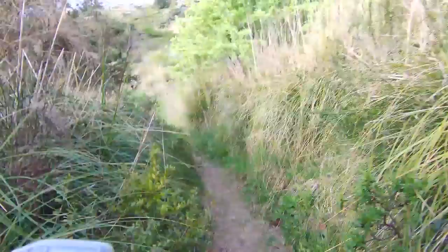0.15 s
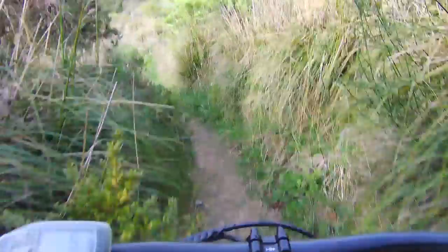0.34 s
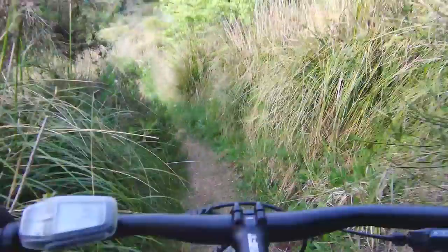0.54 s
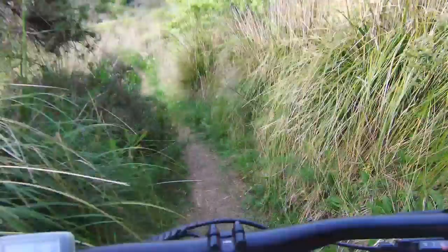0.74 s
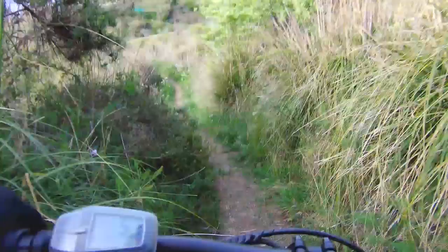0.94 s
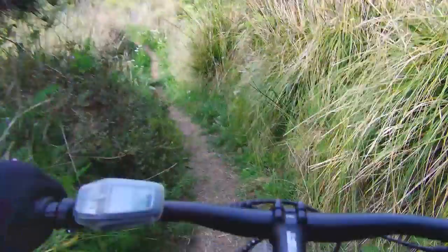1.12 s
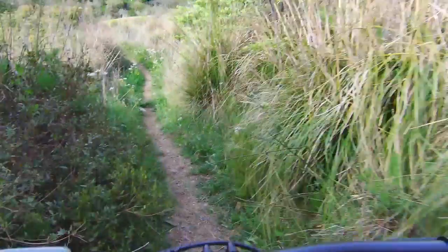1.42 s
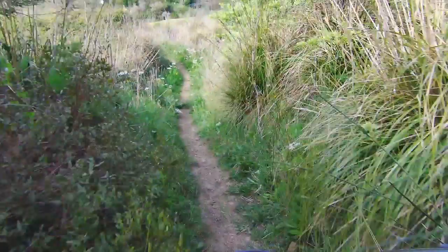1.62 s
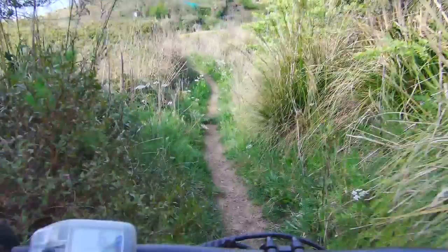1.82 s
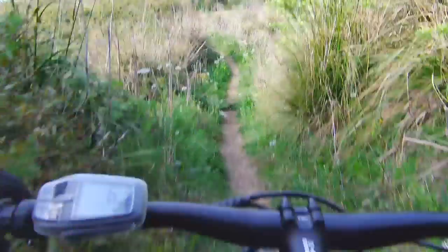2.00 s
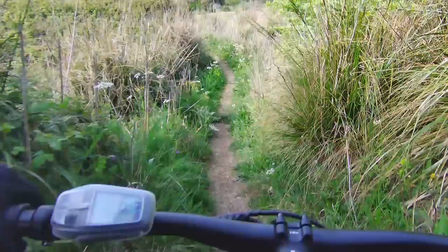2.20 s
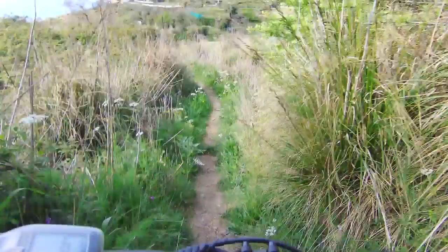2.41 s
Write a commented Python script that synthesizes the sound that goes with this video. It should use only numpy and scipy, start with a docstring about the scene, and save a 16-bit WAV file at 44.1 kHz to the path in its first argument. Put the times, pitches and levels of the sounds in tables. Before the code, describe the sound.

Muffled scuffing and knocking of a camera case on a bike ridden through tall grass

```python
"""A bike on a narrow dirt trail through tall grass, heard inside a closed case that is shaken and brushed.
Opens on light scuffing of filtered grains, over coloured-noise tyre rumble and faint hiss that run throughout.
From 0.2 s scuffs come thick, with trail bumps, stick-slip creaks and stem flicks (pings) and knocks (clicks).
Grass swishes (rough tones in airy noise) from 0.38 s to 2.03 s; dry stalks snap (noise bursts) from 0.91 s.
Rumble peaks near 1.28 s; the last knock falls at 1.98 s, the last creak at 2.31 s, a soft scuff at 2.42 s."""
import sys
import numpy as np
from scipy import signal
from scipy.fft import rfft, irfft
from scipy.io import wavfile
from scipy.ndimage import uniform_filter1d

SR = 44100
rng = np.random.default_rng(int(sys.argv[2]) if len(sys.argv) > 2 else 0)


def dump_mix(stems):
    """Bounce the given channels to the path in sys.argv[1] as a 16-bit WAV at rate SR."""
    frames = np.atleast_2d(stems).T  # one column per channel
    limited = np.clip(frames, -1, 1)  # hard clip at full scale
    pcm = np.round(limited * 32767).astype(np.int16)
    wavfile.write(sys.argv[1], SR, pcm)


N = 112454

# scuffs on the case: full_pressure_s, rise_s, hold_s, fall_t60_s, bass_db, low_modes_db, middle_modes_db, top_modes_db
SCUFF_STROKES = [ (0.010, 0.012, 0.022, 0.66, -68.5, -63.5, -64.5, -65.5),
                 (0.212, 0.013, 0.14, .20, -65, -54.5, -56.5, -65.5),
                 (0.307, 0.029, 0.0066, 0.22, -51, -41, -42, -45.5),
                 (0.342, 0.016, 0.013, 0.29, -49, -46, -48, -55.5),
                 (0.429, 0.048, 0.036, 0.76, -60, -53.5, -61, -63.5),
                 (0.505, 0.0035, 0.014, 0.18, -58.5, -54.5, -50, -56.5),
                 (0.646, 0.0054, 0.0063, 0.26, -55.5, -49.5, -56, -65.5),
                 (0.744, 0.02, 0.013, 0.072, -49.5, -44, -38.5, -42),
                 (0.773, 0.015, 0.02, 0.4, -50, -42.5, -44.5, -54),
                 (0.839, 0.012, 0.0044, 0.077, -60, -69, -66, -50.5),
                 (0.884, 0.033, 0.028, 0.16, -55.5, -51, -54.5, -67),
                 (1.033, 0.012, 0.006, 0.21, -53.5, -47.5, -42.5, -55),
                 (1.102, 0.059, 0.006, 0.35, -55, -44.5, -44.5, -52.5),
                 (1.191, 0.0023, 0.0064, 0.21, -47, -45, -46, -51.5),
                 (1.402, 0.0059, 0.0095, 0.24, -49.5, -40, -42, -45.5),
                 (1.454, 0.005, 0.016, 0.1, -55.5, -42.5, -48.5, -50),
                 (1.497, 0.015, 0.0088, 0.32, -66, -46, -50.5, -55.5),
                 (1.602, 0.0048, 0.02, 0.16, -57.5, -52.5, -56, -69),
                 (1.643, 0.024, 0.021, 0.29, -64.5, -52, -41.5, -48),
                 (1.682, 0.0049, 0.004, 0.2, -50, -46.5, -72, -50),
                 (1.744, 0.04, 0.019, 0.2, -53, -49, -49.5, -52.5),
                 (1.82, 0.028, 0.023, 0.24, -90, -57, -60.5, -57.5),
                 (1.935, 0.036, 0.0072, 0.17, -57, -49, -39, -44.5),
                 (1.962, 0.018, 0.015, 0.24, -51, -42, -44, -48.5),
                 (2.041, 0.021, 0.0063, 0.25, -54.5, -49.5, -51.5, -60.5),
                 (2.113, 0.092, 0.015, 0.34, -56, -60.5, -64, -62.5),
                 (2.261, 0.021, 0.0035, 0.17, -62.5, -56.5, -51.5, -59),
                 (2.276, 0.014, 0.0049, 0.37, -58.5, -51.5, -49.5, -62.5),
                 (2.416, 0.044, 0.05, 0.45, -75, -64, -68.5, -61.5)]
# modes of the case and its mount, three groups: mode_hz, width_hz, relative_level_db
CASE_LOW_MODES = [(287.4, 27.6, 6), (355, 21, -1.5), (398, 45, -1.5), (478.4, 39, 5.5)]
CASE_MIDDLE_MODES = [(605, 8.5, -1), (647, 33, 2.5), (690, 78, 2.5), (789, 17.6, -1.5), (890, 150, -3),
                     (940, 150, -5.5)]
CASE_TOP_MODES = [(1040, 170, 2.5), (1254, 49, -1.5), (1374, 73, -2.5), (1508, 64, -5), (1770, 660, -8),
                  (2110, 290, -8.5)]
# hard knocks on the case: start_s, peak_db, top_cutoff_hz
CASE_KNOCKS = [(0.3105, -30, 1410), (0.756, -21.5, 1320), (1.0372, -43, 1180), (1.1867, -21, 900),
               (1.6497, -31.5, 1230), (1.656, -39, 1100), (1.669, -38, 1460), (1.9340, -28, 1430),
               (1.9812, -25, 1150)]
# stick-slip creaks: start_s, peak_db, pitch_hz, swell_s
STICK_SLIP_CREAKS = [(0.041, -57.5, 1045, 0.0061), (0.283, -33, 825, 0.0048), (0.3128, -30, 680, 0.0037),
                     (0.3450, -33.5, 775, 0.0051), (0.7150, -33, 856, 0.0027), (0.7370, -32, 770, 0.0027),
                     (0.7875, -34.5, 702, 0.0043), (1.034, -32.5, 830, 0.0023), (1.0895, -28, 840, 0.0011),
                     (1.0978, -33.5, 767, 0.0022), (1.1042, -29.5, 780, 0.0025), (1.4035, -36, 750, 0.006),
                     (1.425, -34.5, 631, 0.008), (1.4535, -39.5, 772, 0.0069), (1.4675, -36.5, 760, 0.0046),
                     (1.6245, -32.5, 790, 0.014), (1.686, -37, 788, 0.0047), (1.9315, -28.5, 860, 0.0014),
                     (1.9790, -30, 676, 0.0034), (2.261, -39.5, 652.5, 0.0049),
                     (2.2750, -41.5, 788, 0.0064), (2.3105, -40, 643, 0.0029)]
# trail bumps that ring the mount: start_s, peak_db, pitch_hz, swell_s
TRAIL_BUMPS = [(0.095, -56, 287, 0.013), (0.2131, -36, 282, 0.009), (0.27, -37.5, 279, 0.014),
               (0.3067, -28.5, 326, 0.0019), (0.364, -35, 270, 0.0092), (1.214, -50.5, 68, 0.015),
               (2.066, -45, 95, 0.0047), (2.0921, -37, 80.5, 0.0056), (2.11, -46.5, 105, 0.0047)]
# stems flick the bars: start_s, peak_db, pitch_hz
STEM_FLICKS = [(0.2855, -49, 1560), (0.347, -45.5, 1960), (0.7385, -45.5, 2110), (0.76, -44, 1400),
               (0.8373, -44.5, 1890), (1.406, -42, 1560), (1.431, -41, 1410), (1.4665, -48, 2020),
               (1.962, -44, 2050), (2.1705, -44.5, 1110)]
# dry stalks snap: full_level_s, level_before_trim_db
STALK_CRACKS = [(0.9068, -48.5), (1.187, -48), (1.209, -65), (1.728, -61), (2.1712, -81)]
# grass along the bars: full_pressure_s, rise_s, hold_s, fall_t60_s, tone_db, pitch_hz, width_hz, air_re_tone_db
GRASS_SWISHES = [ (0.38, 0.015, 0.008, 0.14, -61.5, 2935, 226, -9),
                 (0.428, .05, .046, .24, -61, 3150, 490, -15), (0.43, .035, .078, .09, -72, 4760, 260, -20),
                 (0.756, 0.11, 0.15, 0.37, -78.5, 2930, 520, 6.5),
                 (1.179, 0.1, 0.028, 0.34, -71, 3160, 674, -0.5),
                 (1.818, 0.17, 0.27, 1, -77, 2970, 450, -21),
                 (2.034, 0.084, 0.012, 0.38, -67.5, 3300, 770, -1.5)]
# airy rustle spectrum: frequency_hz, relative_density_db
RUSTLE_SPECTRUM = [(800, 14), (1400, 2), (2200, 32), (2700, 15), (4000, -13), (4800, 12), (8000, -30),
                   (16000, -64)]
# tyres on dirt, spectrum: frequency_hz, relative_density_db
TYRE_SPECTRUM = [(25, 5.5), (70, -4), (130, 3.5), (200, -4), (290, 0.5), (420, 3), (650, -1.5),
                 (1300, -10.5), (2000, -23.5), (3000, -46), (5000, -60)]
# tyre rumble follows the roughness of the trail: time_s, level_db
TYRE_LEVEL = [(0, -62.5), (.19, -70), (.45, -74), (.7, -62.5), (1.0, -61), (1.28, -55), (1.355, -68.5),
              (1.5, -57), (1.9, -66.5), (2.22, -64.5), (2.36, -61), (2.55, -64)]
# treble hiss, spectrum: frequency_hz, relative_density_db
HISS_SPECTRUM = [(1500, 4.5), (2500, 6), (3800, -0.5), (4800, 0.5), (7000, -1.5), (16000, -1.5)]
# treble hiss: time_s, level_db
HISS_LEVEL_CURVE = [(0, -72.5), (.22, -75.5), (.32, -71.5), (.6, -72.5), (.88, -68), (1.0, -74), (1.2, -67),
                    (1.35, -76.5), (1.46, -70), (1.58, -70.5), (1.75, -69), (1.9, -71.5), (2.03, -67),
                    (2.22, -73.5), (2.323, -71.5), (2.55, -73.5)]

# *_RMS_DB and *_RMS_RAD: spread of a random wander; *_RATE_HZ: its low-pass corner
FULL_PRESSURE_GRAINS_PER_S, GRAIN_SPREAD_DB = 970, 3.5
GRAIN_RATE_POWER = 0.8  # grain rate ~ pressure ** power
MODE_SWAY_RMS_DB, MODE_SWAY_RATE_HZ = 2, 8.5
JUDDER_RMS_DB, JUDDER_RATE_HZ = 0.5, 33
BASS_HZ, BASS_WIDTH_HZ = 120.3, 78
CASE_LOW_HZ, CASE_TOP_HZ = 169, 1800
MIDDLE_LOW_HZ, MIDDLE_TOP_HZ, TOP_LOW_HZ = 404, 1196, 900
KNOCK_LOW_HZ = 312
CREAK_SLIP_RMS_RAD, CREAK_SLIP_RATE_HZ = 0.28, 174
FLICK_SWELL_S = 0.00073
CRACK_RISE_S, CRACK_T60_S, CRACK_TRIM_DB = 0.00026, 0.0056, -6
CRACK_LOW_HZ, CRACK_TOP_HZ = 1515, 6800
ZIP_ARCH_FRACTION, ZIP_ARCH_S = 0.07, 0.06
FLUTTER_RMS_DB, FLUTTER_RATE_HZ = 1, 90
TYRE_SWAY_RMS_DB, TYRE_SWAY_RATE_HZ = 0.5, 27
HISS_FLICKER_RMS_DB, HISS_FLICKER_RATE_HZ = 1.5, 20.4
CUTOFF_HZ = 15750


def scuffs():
    """Contact pressure drives mount bass and three groups of case modes, with judder."""
    band_powers = sum((from_db(row[4:])[:, None] * stroke(*row[:4])) ** 2 for row in SCUFF_STROKES)
    pressure = np.sqrt(band_powers)

    bass = rubbed([(BASS_HZ, BASS_WIDTH_HZ, 0)], pressure[0])
    bass = evened(cut(bass, 260, "low"), size=1800)

    low = cut(rubbed(CASE_LOW_MODES, pressure[1]), CASE_LOW_HZ, "high")
    low = evened(cut(low, 464, "low"))

    middle = cut(rubbed(CASE_MIDDLE_MODES, pressure[2]), MIDDLE_TOP_HZ, "low", order=4)
    middle = evened(cut(middle, MIDDLE_LOW_HZ, "high"), size=700)

    top = cut(rubbed(CASE_TOP_MODES, pressure[3]), CASE_TOP_HZ, "low", order=6)
    top = evened(cut(top, TOP_LOW_HZ, "high"))

    judder = from_db(JUDDER_RMS_DB * drift(JUDDER_RATE_HZ))
    return (pressure * [bass, low, middle, top]).sum(axis=0) * judder


def rubbed(modes, pressure):
    """Grains ring resonances; light contact thins them to ticks, a moving contact favours other modes."""
    grains_per_s = FULL_PRESSURE_GRAINS_PER_S * (pressure / pressure.max()) ** GRAIN_RATE_POWER
    out = 0
    for hz, width_hz, db in modes:
        radius = np.exp(-np.pi * width_hz / SR)
        poles = [1, -2 * radius * np.cos(2 * np.pi * hz / SR), radius * radius]
        ringing = signal.lfilter([1, 0, -1], poles, grains(grains_per_s) + 1e-18)
        sway_db = MODE_SWAY_RMS_DB * drift(MODE_SWAY_RATE_HZ)
        out = out + from_db(db + sway_db) * rms_one(ringing)
    return out


def grains(per_s):
    """Tiny catches of uneven size and random sign, at random times."""
    sizes = from_db(GRAIN_SPREAD_DB * np.minimum(rng.exponential(1, N), 4))
    signs = rng.choice([-1, 1], N)
    return sizes * signs * (rng.random(N) < per_s / SR)


def knocks():
    """Single hard contacts: band-limited impulses, dulled by the case."""
    out = np.zeros(N)
    for start_s, peak_db, top_hz in CASE_KNOCKS:
        impulse = signal.unit_impulse(N, int(start_s * SR))
        click = cut(cut(impulse, top_hz, "low", order=5), KNOCK_LOW_HZ, "high")
        out += from_db(peak_db) * click / np.abs(click).max()
    return out


def creaks():
    """Stick-slip pings; each catch lets go a little early or late, so the phase wanders."""
    slip_rad = CREAK_SLIP_RMS_RAD * drift(CREAK_SLIP_RATE_HZ)
    return sum(ping(*row, slip_rad) for row in STICK_SLIP_CREAKS)


def bumps():
    """Trail bumps ring the mount as short low pings."""
    return sum(ping(*row) for row in TRAIL_BUMPS)


def flicks():
    """Single stems strike the bars as very short pings."""
    return sum(ping(*row, FLICK_SWELL_S) for row in STEM_FLICKS)


def cracks():
    """Dry stalks snap: tiny bright bursts of band-passed noise."""
    noise = cut(rng.standard_normal(N), CRACK_LOW_HZ, "high")
    snap = rms_one(cut(noise, CRACK_TOP_HZ, "low"))
    level = sum(from_db(db + CRACK_TRIM_DB) * stroke(s, CRACK_RISE_S, 0, CRACK_T60_S)
                for s, db in STALK_CRACKS)
    return snap * level


def grass():
    """Blades slide over the bars: a thin fluttering zip that rises and falls, in airy rustle."""
    out, air = 0, coloured(RUSTLE_SPECTRUM)
    for full_s, rise_s, hold_s, t60_s, tone_db, hz, width_hz, air_db in GRASS_SWISHES:
        # pitch peaks as the blade bears fully on the bar, sags either side
        away = (np.arange(N) / SR - full_s) / ZIP_ARCH_S
        pitch_hz = hz * (1 - ZIP_ARCH_FRACTION * away ** 2 / (1 + away ** 2))
        swish = rough_tone(pitch_hz, width_hz) + from_db(air_db) * air
        out = out + from_db(tone_db) * stroke(full_s, rise_s, hold_s, t60_s) * swish
    return out * from_db(FLUTTER_RMS_DB * drift(FLUTTER_RATE_HZ))


def rough_tone(hz, width_hz):
    """A friction tone whose strength and phase keep slipping: narrow noise on a moving carrier."""
    phase = 2 * np.pi * np.cumsum(hz) / SR
    a, b = cut(rng.standard_normal((2, N)), width_hz / 2, "low", order=3)
    return evened(a * np.cos(phase) + b * np.sin(phase), size=500)


def tyres():
    """Rumble of tyres on dirt: coloured noise that follows the trail roughness."""
    level_db = np.interp(np.arange(N) / SR, *np.transpose(TYRE_LEVEL))
    sway_db = TYRE_SWAY_RMS_DB * drift(TYRE_SWAY_RATE_HZ)
    return coloured(TYRE_SPECTRUM) * from_db(level_db + sway_db)


def hiss():
    """Faint treble noise with a flickering level."""
    level_db = np.interp(np.arange(N) / SR, *np.transpose(HISS_LEVEL_CURVE))
    flicker_db = HISS_FLICKER_RMS_DB * drift(HISS_FLICKER_RATE_HZ)
    return coloured(HISS_SPECTRUM) * from_db(level_db + flicker_db)


def stroke(full_s, rise_s, hold_s, t60_s):
    """Pressure of one contact: exponential swell up to full_s, hold, exponential fall."""
    t = np.arange(N) / SR - full_s
    swell = np.exp(2 * np.minimum(t, 0) / rise_s)
    fall = from_db(-60 * np.maximum(t - hold_s, 0) / t60_s)
    return swell * fall


def ping(start_s, peak_db, hz, swell_s, slip_rad=0):
    """A sine that swells to its peak in swell_s and dies; slip_rad shifts its phase."""
    t = np.maximum(np.arange(N) / SR - start_s, 0)
    u = np.minimum(t / swell_s, 20)
    envelope = u ** 2 * np.exp(2 - 2 * u)
    return from_db(peak_db) * envelope * np.sin(2 * np.pi * hz * t + slip_rad)


def evened(x, size=1100):
    """Hold power near 1 over size samples, so that the contact pressure sets the level."""
    power = np.abs(uniform_filter1d(x ** 2, size))
    return x / np.sqrt(power + 1e-3 * np.mean(x ** 2))


def coloured(points):
    """Steady noise of unit power, spectrum interpolated in dB over log frequency."""
    hz, db = np.transpose(points)
    f = np.maximum(np.fft.rfftfreq(N, 1 / SR), 1)
    gain = from_db(np.interp(np.log(f), np.log(hz), db))
    return rms_one(irfft(rfft(rng.standard_normal(N)) * gain, N))


def drift(rate_hz):
    """Random wander of spread 1: low-passed noise, its first second dropped to settle the filter."""
    return rms_one(cut(rng.standard_normal(N + SR), rate_hz, "low")[SR:])


def cut(x, hz, kind, order=2):
    """Butterworth filter."""
    return signal.sosfilt(signal.butter(order, hz, kind, fs=SR, output="sos"), x + 1e-18)


def rms_one(x):
    """Scale to unit power."""
    return x / np.sqrt(np.mean(x ** 2) + 1e-20)


def from_db(db):
    """Decibels to amplitude gain."""
    return 10 ** (np.asarray(db) / 20)


def scene():
    """Sum of all sources at one microphone."""
    contacts = scuffs() + knocks() + creaks() + bumps() + flicks()
    plants = cracks() + grass()
    return (contacts + plants + tyres() + hiss())[None]


def record(dry):
    """Steep elliptic low-pass: 0.1 dB ripple, 70 dB stop band."""
    return signal.sosfilt(signal.ellip(12, 0.1, 70, CUTOFF_HZ, fs=SR, output="sos"), dry)


dry = scene()
out = record(dry)
dump_mix(out)
```